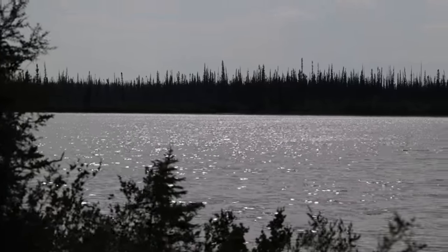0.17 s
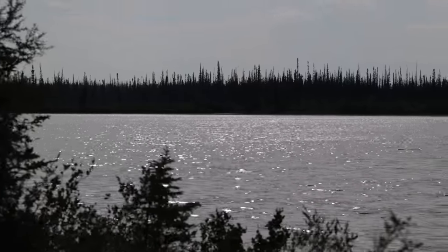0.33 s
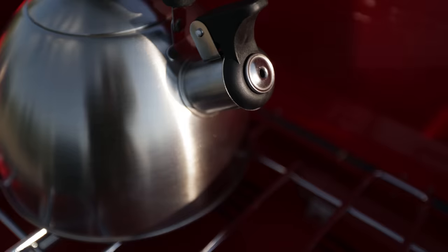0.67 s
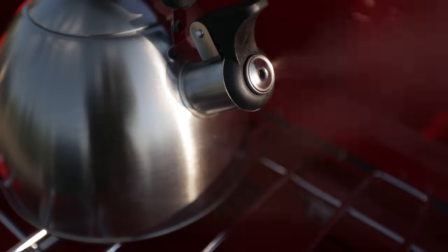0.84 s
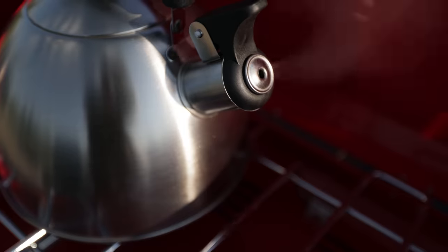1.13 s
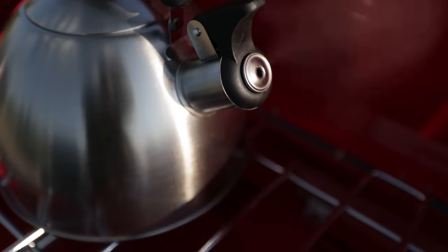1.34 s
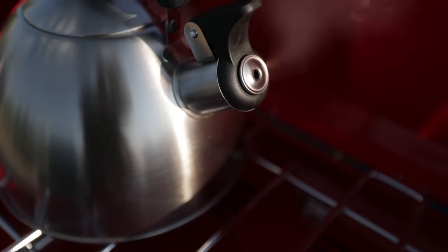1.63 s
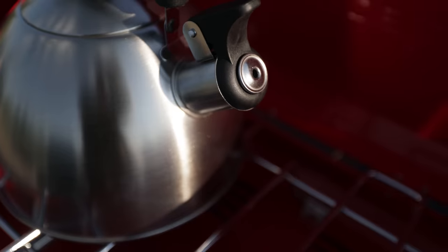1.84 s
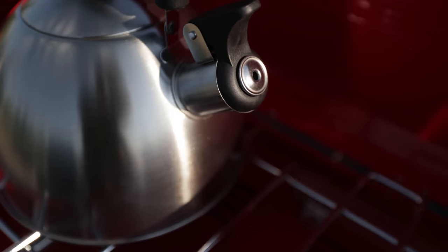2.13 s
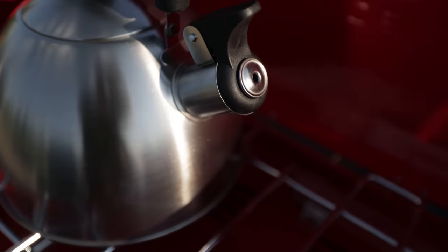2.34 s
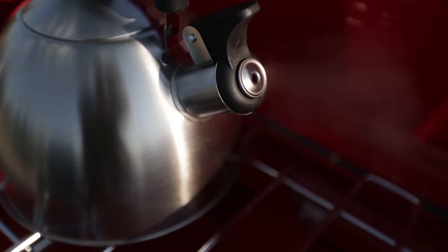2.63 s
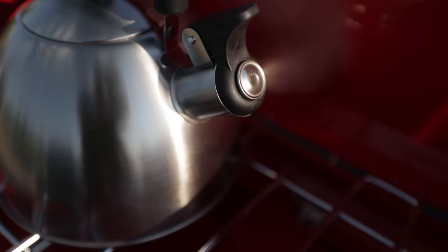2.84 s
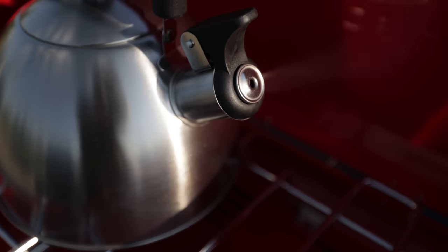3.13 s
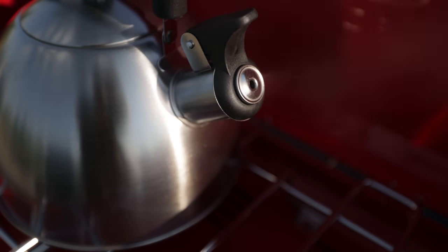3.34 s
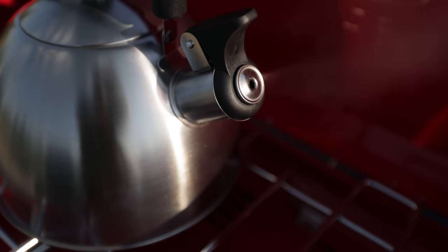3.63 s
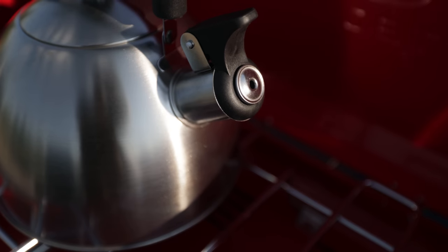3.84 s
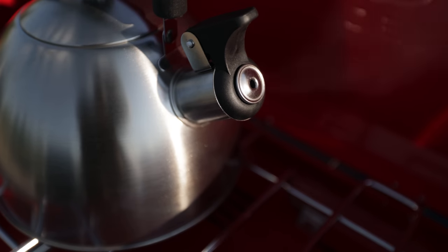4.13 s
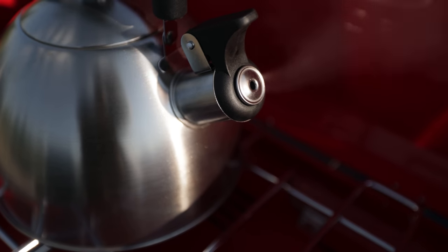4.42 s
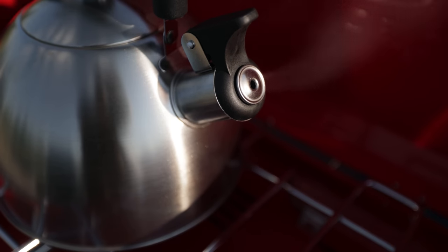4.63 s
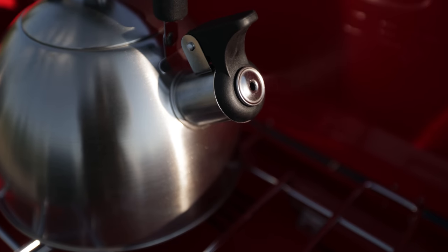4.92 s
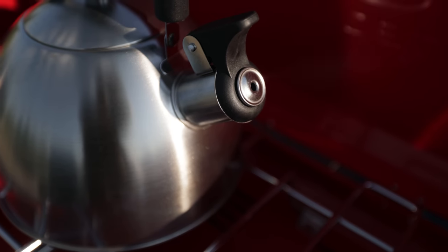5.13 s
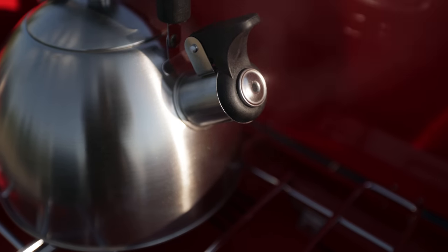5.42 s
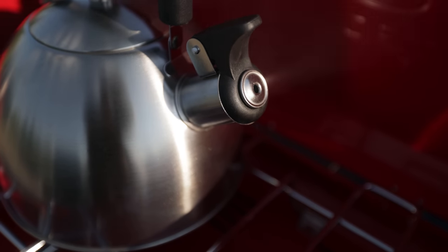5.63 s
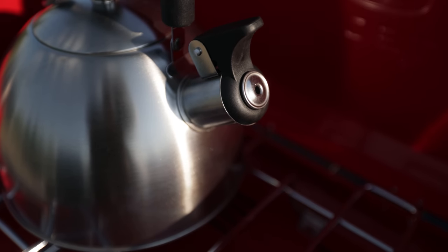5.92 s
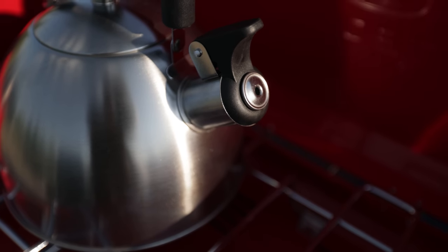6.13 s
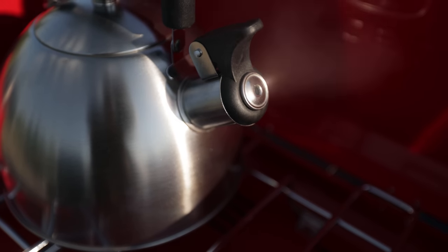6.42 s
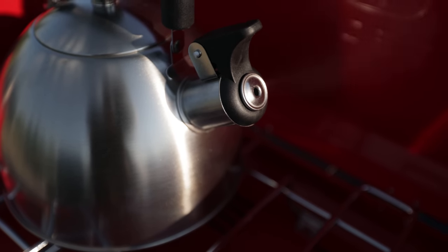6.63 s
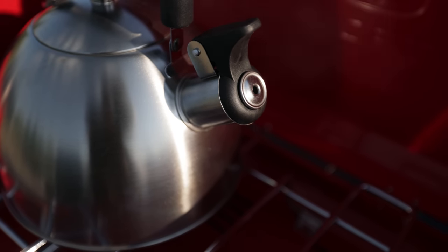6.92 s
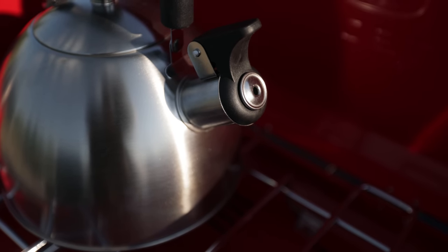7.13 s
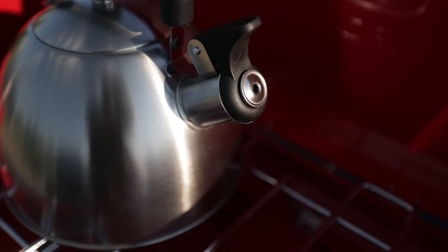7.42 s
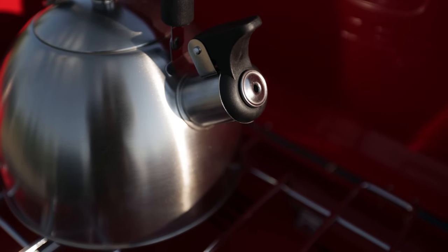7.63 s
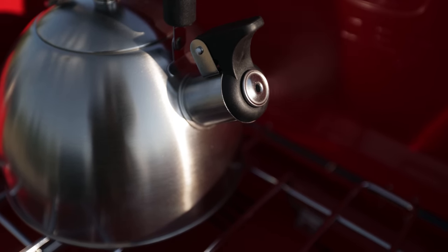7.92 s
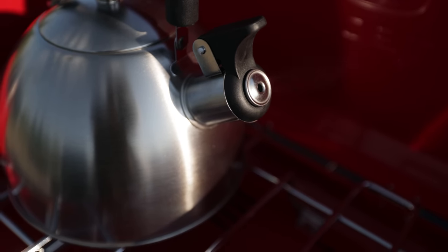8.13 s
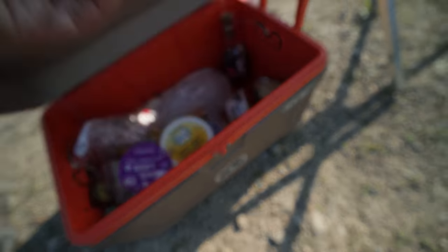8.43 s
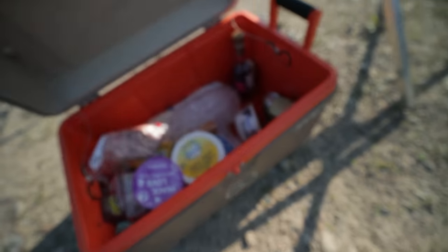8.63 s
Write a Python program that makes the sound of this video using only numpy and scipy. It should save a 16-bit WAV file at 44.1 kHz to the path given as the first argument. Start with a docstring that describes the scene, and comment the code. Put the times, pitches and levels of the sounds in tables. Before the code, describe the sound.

A boiling kettle's piercing, unsteady whistle, dry and close to the microphone in open air. It starts faint under a wind thump, grows louder, switches register suddenly, and gains a buzzy undertone around two to three seconds. Breathy steam hiss flares with each surge. A long shaky lower spell follows, then a high note fades out among quick plasticky clicks and a swelling low gust.

```python
"""A steel kettle whistles on a camp stove, close to a microphone in light wind.
A gust that breaks off within the first second opens over the high tone of the steam jet.
High and low tones then take turns in spells, an undertone joins at 2 s, and tones that sound
together mix into sum and difference tones. Shaped-noise hiss and roar lie beneath, rising with the pitch.
From 8 s something rattles, as decaying rings and scratchy ticks, while the wind swells again."""
import sys
import numpy as np
from scipy import signal
from scipy.fft import rfft, irfft
from scipy.io import wavfile
from scipy.ndimage import uniform_filter1d

SR = 44100
rng = np.random.default_rng(int(sys.argv[2]) if len(sys.argv) > 2 else 0)


def to_wav(sig):
    """Store sig (one row per channel, or 1-D mono) as 16-bit WAV at the path in sys.argv[1].

    Samples outside -1..1 are clipped; the rate is SR.
    """
    pcm = np.clip(np.atleast_2d(sig), -1, 1) * 32767
    pcm = np.round(pcm).astype(np.int16)
    wavfile.write(sys.argv[1], SR, pcm.T)  # frames by channels


def to_linear_factor(level_db):
    """Convert decibel levels (scalar or array-like) to linear amplitude factors."""
    exponent = np.asarray(level_db, float) / 20
    return 10 ** exponent


N = 387198


def evened(x):
    """Scales to rms 1."""
    return x / np.sqrt(np.mean(x ** 2) + 1e-20)


def curve(rows, column=1):
    """One column of a timed table, interpolated at every sample."""
    rows = np.array(rows, float)
    return np.interp(np.arange(N) / SR, rows[:, 0], rows[:, column])


def colour(points, hz):
    """Gain of a spectrum at hz, interpolated over log frequency."""
    point_hz, db = np.transpose(points)
    return to_linear_factor(np.interp(np.log(hz + 1), np.log(point_hz + 1), db))


def wander(size):
    """Random drift of rms 1, smooth over size samples."""
    smooth = uniform_filter1d(rng.standard_normal(N), size)
    return evened(uniform_filter1d(smooth, size))


def noise(points, patchy_db):
    """Coloured noise in drifting patches; a 1 kHz wide band at 0 dB has rms 1."""
    hz = np.fft.rfftfreq(1024, 1 / SR)
    real, imag, patches = rng.standard_normal((N // 256 + 5, len(hz), 3)).T
    patches = uniform_filter1d(patches, 12, 0)  # over frequency
    patches = evened(uniform_filter1d(patches, 8, 1))  # over time
    cells = (real + 1j * imag) * to_linear_factor(patchy_db * patches)
    white = evened(signal.istft(cells, nperseg=1024, noverlap=768)[1][:N])
    gain = colour(points, np.fft.rfftfreq(N, 1 / SR))
    return irfft(rfft(white) * gain, N) * np.sqrt(SR / 2 / 1000)


# Pushes of the boil. Each row: start in seconds, length in seconds, nominal push in %.
SURGE_ROWS = [(0.03, 0.33, 3), (0.215, 0.31, 3.5), (0.518, 0.12, 4.8), (0.605, 0.038, 6.3),
              (0.715, 0.058, 7.6), (0.826, 0.077, 11), (0.978, 0.094, 10.4), (1.016, 0.27, 5.2),
              (1.105, 0.14, 4.8), (1.235, 0.076, 3.3), (1.267, 0.075, 4.7), (1.359, 0.088, 7.3),
              (1.454, 0.24, 5.5), (1.58, 0.13, 4.8), (1.611, 0.069, 5.4), (1.697, 0.078, 7.0),
              (1.794, 0.043, 5.9), (1.827, 0.17, 7.9), (2.054, 0.073, 4.2), (2.381, 0.11, 7.6),
              (2.504, 0.21, 3.7), (2.553, 0.046, 6.4), (2.64, 0.07, 3.2), (2.675, 0.15, 4),
              (2.8, 0.067, 6.8), (2.981, 0.048, 7.3), (3.162, 0.23, 2.6), (3.236, 0.1, 3.3),
              (3.326, 0.095, 5.7), (3.368, 0.23, 4.3), (3.464, 0.049, 3.6), (3.522, 0.2, 8.45),
              (3.638, 0.03, 5.2), (3.701, 0.037, 7.6), (3.781, 0.11, 3.05), (3.821, 0.059, 5.3),
              (3.883, 0.095, 4), (3.963, 0.094, 2.45), (4.068, 0.11, 9.8), (4.411, 0.04, 4.6),
              (4.528, 0.1, 9.8), (4.768, 0.16, 5.1), (4.865, 0.055, 4.2), (5.063, 0.19, 7.5),
              (5.215, 0.151, 6.5), (5.289, 0.049, 4.9), (5.369, 0.11, 4.2), (5.479, 0.29, 6.4),
              (5.534, 0.099, 8.3), (5.626, 0.073, 10.3), (5.678, 0.22, 5.5), (5.713, 0.036, 9.1),
              (5.749, 0.089, 5.4), (5.853, 0.23, 4), (5.895, 0.12, 8.8), (6.004, 0.071, 9.6),
              (6.049, 0.096, 3.2), (6.152, 0.082, 9.5), (6.243, 0.06, 5.3), (6.323, 0.18, 2.3),
              (6.354, 0.064, 4.5), (6.495, 0.19, 3), (6.522, 0.14, 4.5), (6.707, 0.13, 7.6),
              (6.801, 0.081, 6.8), (6.848, 0.19, 10.1), (6.966, 0.065, 4.7), (7.005, 0.23, 7.5),
              (7.073, 0.086, 3.2), (7.16, 0.19, 10.8), (7.275, 0.1, 12.6), (7.36, 0.079, 10.7),
              (7.415, 0.204, 12.2), (7.547, 0.28, 8.8), (7.697, 0.06, 5), (7.75, 0.25, 5.6),
              (7.814, 0.087, 4.5), (7.968, 0.2, 7.3), (8.012, 0.057, 3.3), (8.333, 0.2, 7.5),
              (8.406, 0.064, 6.8), (8.51, 0.1, 3.9), (8.585, 0.18, 3.4)]
SURGE_RISE_S, SURGE_HOLD = 0.024, 1.87  # a larger hold keeps the push up longer


def surges():
    """Push of the boil in %: each surge rises quickly and sinks back over its length."""
    out = np.zeros(N + SR)
    for start_s, length_s, push in SURGE_ROWS:
        t = np.arange(0, length_s, 1 / SR)
        rise = np.sin(np.pi / 2 * np.minimum(t / SURGE_RISE_S, 1))
        fall = np.cos(np.pi / 2 * (t / length_s) ** SURGE_HOLD)
        out[round(start_s * SR):][:len(t)] += push * (rise * fall) ** 2
    return out[:N]


FLIP_S = 0.01  # time a tone takes to catch or die


def tone(hz, level_db, spells, jitter_hz, flutter_db, size):
    """Pitch, phase and height of a tone sounding in spells; turbulence shakes it, a faint tone most."""
    t = np.arange(N) / SR
    gate = np.zeros(N)
    for start_s, end_s, db in spells:
        caught = np.clip((t - start_s) / FLIP_S + 0.5, 0, 1)
        died = np.clip((t - end_s) / FLIP_S + 0.5, 0, 1)
        gate += to_linear_factor(db) * (caught - died)
    gate = abs(gate + 1e-9)
    shaken_hz = hz + jitter_hz * wander(size) + 0.002 * hz * wander(500)
    phase = 2 * np.pi * np.cumsum(shaken_hz) / SR
    faintness = np.clip(gate ** -0.3, 1, 3)
    flutter = flutter_db * wander(350) * faintness
    height = np.sqrt(2) * gate * to_linear_factor(level_db + flutter) + 1e-9
    return hz, phase, height


# Slow steam pressure as high-tone pitch. Each row: time in seconds, pitch before the push in Hz.
PRESSURE_HZ = [(0.0, 3750), (0.2, 4280), (0.8, 4024), (0.95, 4560), (1.25, 3736), (1.45, 3695),
               (1.63, 3997), (1.77, 3593), (2.2, 3110), (2.4, 3070), (3.28, 3470), (3.46, 4255),
               (4.05, 4333), (4.3, 5063), (4.6, 4695), (5.0, 3811), (5.5, 4235), (5.85, 4140), (6.5, 4477),
               (6.8, 4818), (7.3, 3952), (7.7, 4058), (7.9, 4640), (8.17, 3693), (8.5, 3832), (8.78, 3505)]
# Low tone follows the pressure, flatter at the bottom. Each row: high tone in Hz, low tone in Hz.
LOW_FROM_HIGH_HZ = [(3000, 2300), (3800, 2460), (4300, 2589), (4900, 2952.6), (5400, 3225)]
# Undertone. Each row: time in seconds, pitch in Hz before it rides on the high tone.
UNDERTONE_HZ = [(1.972, 1810), (2.247, 1690), (2.389, 1692), (2.43, 1780), (2.51, 1725), (2.826, 1784),
                (3.338, 1860)]
# Jet strength. Each row: time in seconds, level in dB before pushes and falters.
STRENGTH_DB = [(0, -35), (.4, -34), (.55, -28.5), (.9, -26), (1.2, -26), (1.47, -23.5), (1.52, -16),
               (1.6, -19), (1.86, -22), (1.98, -25.5), (2.6, -17), (3.0, -13.5), (3.35, -13), (3.6, -15),
               (4.55, -11.5), (4.74, -17.5), (5.03, -21), (5.15, -16), (5.6, -15.5), (5.83, -19),
               (6.1, -15), (6.66, -15.5), (6.75, -12), (7.15, -17.5), (8.05, -15.5), (8.17, -20),
               (8.6, -20), (8.78, -33)]
# Momentary falters. Each row: centre in seconds, change in dB.
FALTER_DB = [(.09, -10), (.152, -8), (.22, -8), (.94, -8), (1.25, -8), (1.645, -8), (2.496, -7),
             (2.614, -7), (2.966, -10), (5.115, -14), (5.15, -8), (5.316, -7), (7.125, -7), (8.303, -13),
             (8.447, -6)]
# Spells of each tone. Each row: start in seconds, end in seconds, level against the strength in dB.
LOW_ON = [(.05, 0.344, -25), (.35, 0.406, -8), (0.397, 0.885, -0.5), (0.888, 1.029, -16.5),
          (1.037, 1.066, -8), (1.079, 1.202, -2), (1.182, 1.242, -0.5), (1.589, 1.618, -11),
          (1.614, 1.752, -0.5), (3.436, 4.965, -0.5), (4.963, 5.109, -29), (5.103, 5.266, -24),
          (5.265, 8.155, -0.5), (8.431, 8.461, -10)]
HIGH_ON = [(0, 0.388, -1), (0.881, 1.182, 2.5), (1.232, 1.621, 0), (1.745, 3.482, -0.5), (3.604, 3.614, 3),
           (4.947, 5.27, 1.5), (8.141, 8.777, -1)]
UNDER_ON = [(1.972, 2.396, -16), (2.411, 3.348, -17.5)]
# Partials of the saturating jet. Each entry: multiples of (low, high, under), with "-" for -1,
# then weight in dB.
PARTIAL_DB = {"100": 0., "200": 0.12, "300": -12, "400": -27.5, "500": -40.5, "010": 0., "020": -13.5,
              "030": -33.5, "110": -5, "-10": -19, "210": -10, "120": -24, "2-0": -28, "-20": -9, "310":
              -19, "001": 0., "01-": -6, "011": 2.4, "02-": 1.6}
# Sputtering spells. Each row: start in seconds, end in seconds, mean throbs per second, depth 0-1.
SPUTTER_SPELLS = [(0.91, 1.07, 260, 0.5), (3.335, 3.39, 290, 0.41), (1.64, 1.74, 850, 0.01)]
FALTER_S = 0.011
DB_PER_PUSH = 0.2666  # dB louder per % of push
SIMMER = 0.8  # pressure shake by countless small bubbles, rms %


def whistle():
    """Jet tones and their mixed partials, each weighed by its tones' shares; also the surge in %."""
    t = np.arange(N) / SR
    push = surges() + SIMMER * wander(650)
    high_hz = curve(PRESSURE_HZ) * np.exp(push / 100)
    low_hz = np.interp(high_hz, *np.transpose(LOW_FROM_HIGH_HZ))
    level_db = curve(STRENGTH_DB) + DB_PER_PUSH * push
    for s, db in FALTER_DB:
        level_db += db * np.exp(-((t - s) / FALTER_S) ** 2)
    low = tone(low_hz, level_db, LOW_ON, jitter_hz=18, flutter_db=1.6, size=60)
    high = tone(high_hz, level_db, HIGH_ON, jitter_hz=23, flutter_db=2.2, size=60)
    under = tone(curve(UNDERTONE_HZ), level_db, UNDER_ON, jitter_hz=30, flutter_db=1.3, size=200)
    pitches, phases, heights = map(list, zip(low, high, under))

    kicks = [hz / uniform_filter1d(hz, 20000) - 1 for hz in pitches]  # pitch against its local mean
    ride_hz = 0.78 * kicks[1] * pitches[2]  # the undertone rides along with the high tone
    phases[2] = phases[2] + 2 * np.pi * np.cumsum(ride_hz) / SR
    total = np.sqrt(sum(h ** 2 for h in heights))
    surge = sum((h / total) ** 2 * 100 * kick for kick, h in zip(kicks, heights))

    partials = np.zeros(N)
    for name, db in PARTIAL_DB.items():
        multiples = [-1 if c == "-" else int(c) for c in name]
        shares = [(h / total) ** abs(m) ** 1.76 for h, m in zip(heights, multiples) if m]
        phase = sum(m * p for p, m in zip(phases, multiples) if m)
        partials += to_linear_factor(db) * np.prod(shares, axis=0) * np.sin(phase)

    fuzz = 1 + 0.059 * wander(25)  # fast turbulence spreads noise around each partial
    for start_s, end_s, rate_hz, depth in SPUTTER_SPELLS:
        throb_hz = rate_hz * (1 + 0.28 * wander(150))
        throb = np.sin(2 * np.pi * np.cumsum(throb_hz) / SR)
        fade = np.interp(t, [start_s, start_s + 0.012, end_s - 0.01, end_s], [0, 1, 1, 0])
        fuzz += depth * throb * fade
    return total * partials * fuzz, uniform_filter1d(surge, 300)


# Boil. Each row: time in seconds, relative hiss level in dB, relative roar level in dB.
BOIL_DB = [(0.07, -74, -54), (0.82, -60, -51), (1.01, -59, -51.5), (1.35, -60.5, -45.5),
           (1.6, -52.5, -43.5), (1.84, -57.5, -41.5), (3.28, -45.5, -29.5), (3.45, -46.5, -40),
           (3.92, -52, -41.5), (4.34, -45.5, -41.5), (5.12, -54, -43), (5.55, -47.5, -40),
           (5.76, -51.5, -43), (6.8, -46.5, -41.5), (7.7, -51, -43), (7.82, -48, -42), (8.55, -57, -40.5)]
# Noise spectra. Each row: frequency in Hz, relative density in dB.
HISS_COLOUR = [(1400, -14), (2000, -18), (3000, 11.5), (5000, 18.5), (6500, 13), (8500, 13.5), (10500, 4.5),
               (12000, 1.5), (14500, -3), (16000, -4)]
ROAR_COLOUR = [(60, -13), (160, -6), (340, 3), (600, -2), (1300, -5.5), (1900, -5), (2600, -7.5),
               (4000, -35)]


def steam(surge):
    """Jet hiss that flares with each surge, over a low burner roar."""
    puffs_db = 1.2 * wander(600)
    hiss_db = curve(BOIL_DB) - 6.5 + 0.4 * surge + puffs_db
    roar_db = curve(BOIL_DB, column=2) + 2.5 + 0.018 * surge
    return noise(HISS_COLOUR, 3.2) * to_linear_factor(hiss_db) + noise(ROAR_COLOUR, 1.94) * to_linear_factor(roar_db)


# Gusts in two lists; the first breaks off at once. Each row: time in seconds, level in dB before lumps.
GUSTS_DB = [
    [(0.07, -27), (0.454, -30), (0.64, -29)],
    [(0.65, -56), (0.69, -61), (0.99, -64), (1.78, -50), (1.87, -68), (2.12, -36), (3.14, -51), (3.18, -38),
     (3.46, -55), (4.77, -69), (5.38, -59), (5.52, -47), (6.18, -54), (6.27, -46), (6.85, -39), (7.15, -52),
     (7.92, -33.5), (8.37, -27.5), (8.78, -39)],
]
# Wind spectrum. Each row: frequency in Hz, relative density in dB.
GUST_COLOUR = [(15, 1.5), (30, -1), (70, 0), (120, -8), (250, -21.5), (600, -53)]


def wind():
    """Lumpy low pressure on the microphone."""
    lumps_db = 2.2 * wander(2500)
    level_db = curve(sum(GUSTS_DB, [])) + lumps_db
    return evened(noise(GUST_COLOUR, 1.0)) * to_linear_factor(level_db)


# Rattles. Each row: time in seconds, relative peak in dB, thud against tick in dB.
KNOCK_ROWS = [(8.0089, -24, -1), (8.0772, -23, 6.5), (8.4592, -21.5, -20), (8.5802, -16.5, -17),
              (8.604, -26, -15), (8.628, -22, -22), (8.637, -24, -17), (8.642, -22, -22),
              (8.6542, -11.5, -19), (8.6602, -14.5, 0), (8.6714, -26, -24), (8.691, -16, -25),
              (8.6982, -29, -13.5), (8.7042, -17.5, 8), (8.7111, -16, 3.5), (8.7165, -19, -25)]
# Modes. Each row: frequency in Hz before random spread, relative level in dB, t60 in seconds.
HOLLOW_MODES = [(364.6, 0, 0.069), (639, 6.5, 0.041), (1005, 3, 0.032)]
TICK_MODES = [(1477, 6.5, 0.011), (2546, 12, 0.0035)]


def knocks():
    """Every knock rings the same hollow body, detuned at random, and gives a bright, scratchy tick."""
    length = 3000
    t, out = np.arange(length) / SR, np.zeros(N + length)
    for s, peak_db, thud_db in KNOCK_ROWS:
        scratch = rng.standard_normal(length) * to_linear_factor(-60 * t / 0.018)
        hit = to_linear_factor(peak_db - 17) * scratch
        thud = [(hz, db + thud_db, t60) for hz, db, t60 in HOLLOW_MODES]
        for hz, db, t60 in TICK_MODES + thud:
            mode_hz = hz * (1 + 0.22 * rng.uniform(-0.76, 1))
            hit += to_linear_factor(peak_db - 9.5 + db - 60 * t / t60) * np.sin(2 * np.pi * mode_hz * t)
        out[round(s * SR):][:length] += hit
    return out[:N]


# Echoes off stove and kettle cancel or add. Each row: centre in Hz, width in Hz, gain in dB.
ECHO_DIPS = [(166.6, 22, 9), (279, 80, -7.5), (336, 21, 7.5), (1095, 120, -8.5), (1448, 28, -22),
             (1896, 39, 4), (2337, 476, -11.5), (2734, 70, -6), (3215, 124, -10), (3948, 223, -9),
             (4700, 260, -5.5), (5547, 155, -7), (6087, 305, -20.5), (7660, 1100, -5.5), (9266, 120, -29),
             (10200, 2900, -3)]


def echoed(x):
    """Echoes around the stove as a causal, minimum-phase filter."""
    hz = np.fft.rfftfreq(N, 1 / SR)
    gain_db = sum(db / (1 + (2 * (hz - centre) / width) ** 2) for centre, width, db in ECHO_DIPS)
    log_gain = np.log(to_linear_factor(gain_db))
    mirrored = np.r_[log_gain, log_gain[-2:0:-1]]
    response = np.exp(np.conj(signal.hilbert(mirrored))[:len(hz)])
    return irfft(rfft(x) * response, N)


def scene():
    """Whistle and steam share the echoes; scattered steam, wind and knocks bypass them."""
    tones, surge = whistle()
    near = echoed(tones + steam(surge))
    scattered = 0.34 * steam(surge)  # fills the dips
    return (near + scattered + wind() + knocks())[None]


def low_pass(x):
    """Removes everything above the highest recorded frequency."""
    return signal.sosfilt(signal.butter(12, 15710, fs=SR, output="sos"), x)


def record(dry):
    """Loud peaks are rounded off softly."""
    mix = 1.16 * np.tanh(dry / 1.024)
    return low_pass(mix)


dry = scene()
out = record(dry)
to_wav(out)
```